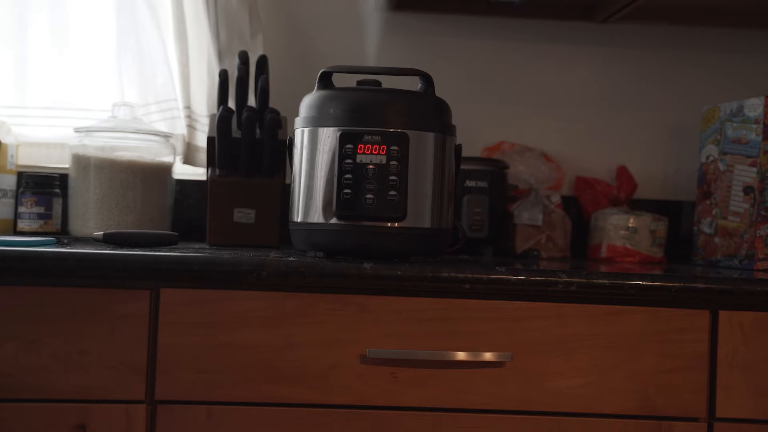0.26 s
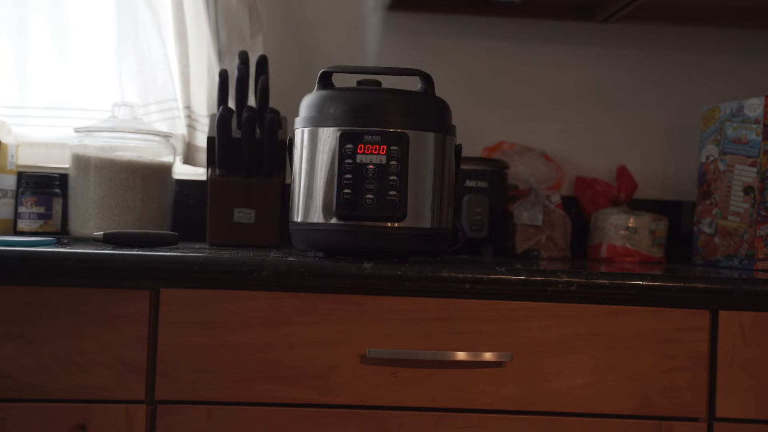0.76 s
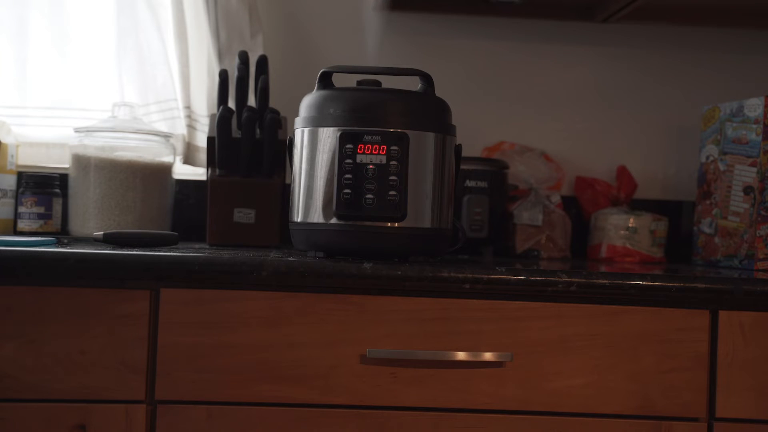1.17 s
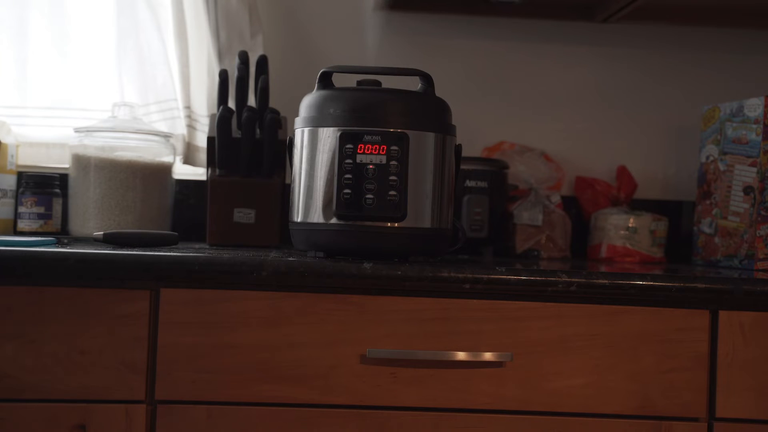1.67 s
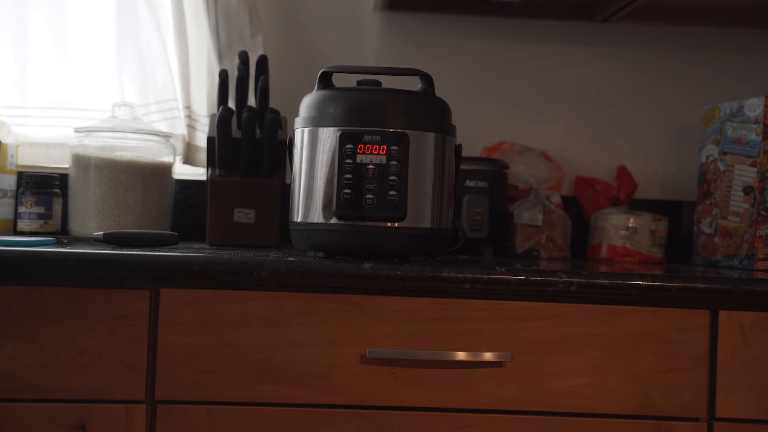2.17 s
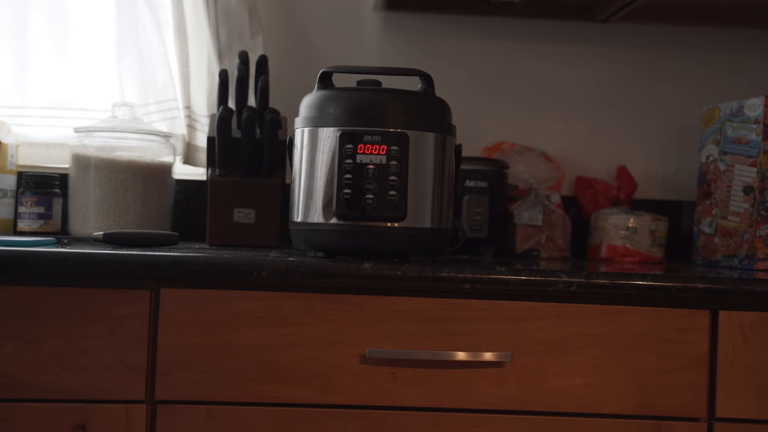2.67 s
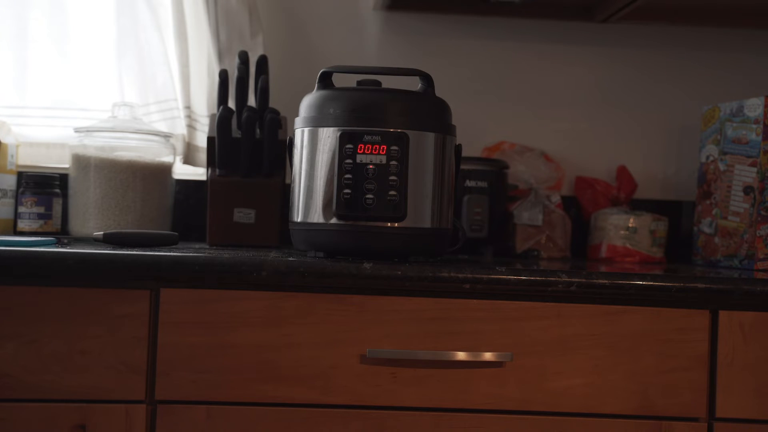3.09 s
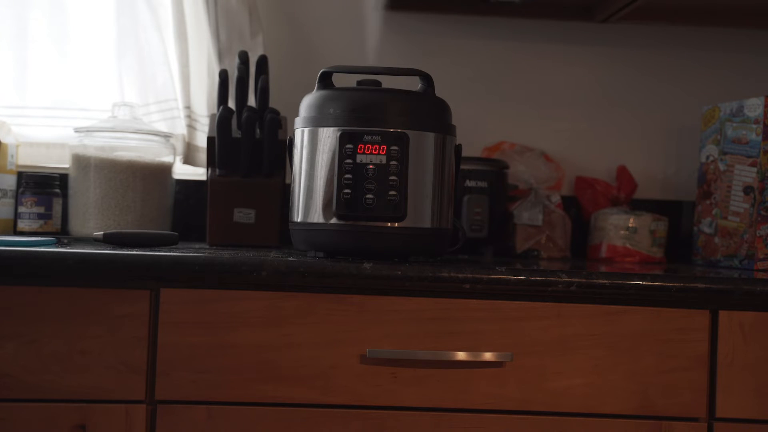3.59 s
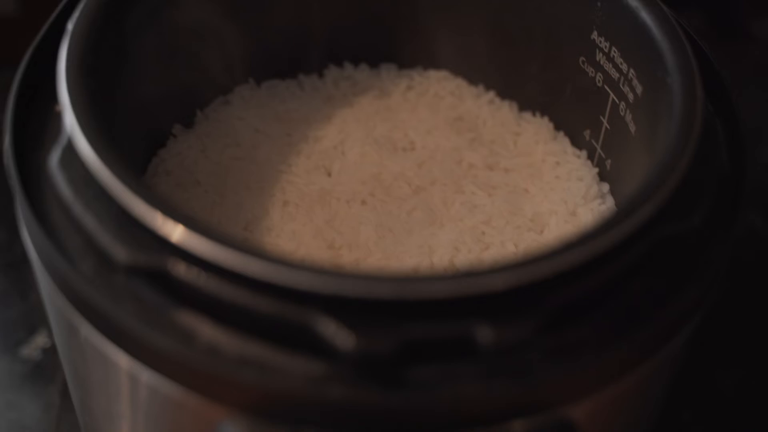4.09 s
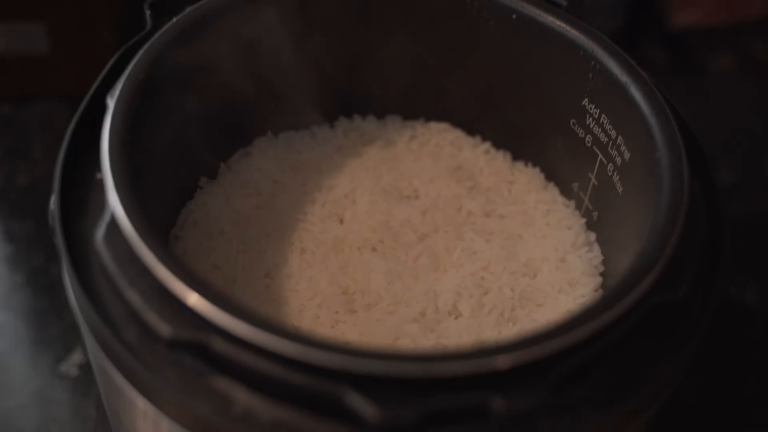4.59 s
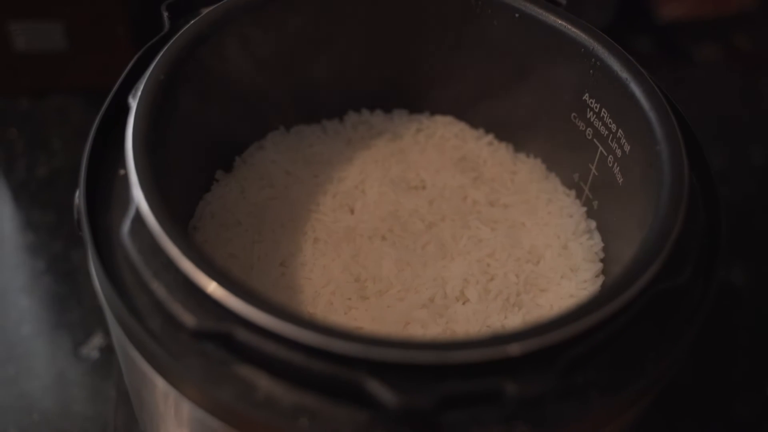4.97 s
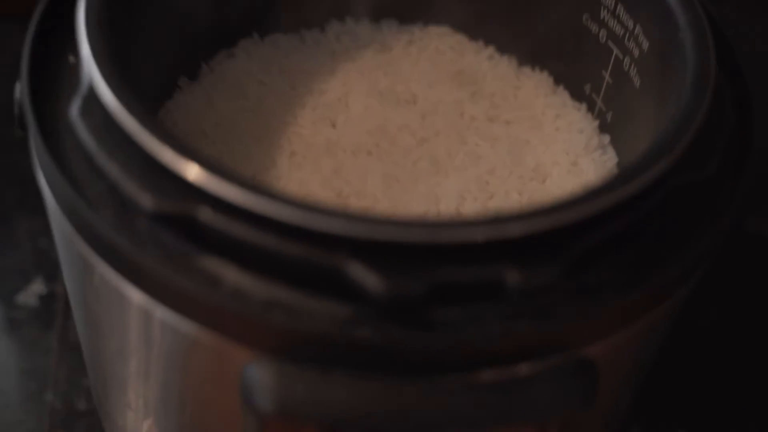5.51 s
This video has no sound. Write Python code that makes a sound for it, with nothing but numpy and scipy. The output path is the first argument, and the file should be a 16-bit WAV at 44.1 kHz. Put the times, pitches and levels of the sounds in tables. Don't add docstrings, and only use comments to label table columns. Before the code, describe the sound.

From 0 s, a pressure cooker vents steam across a kitchen: a dense, bright, steady hiss with little bass, tinged by narrow metallic whistling resonances, with short room reflections. It starts slightly fuller during the first third of a second, then very gradually eases. A barely perceptible mains hum lies beneath. Close, small handling sounds intrude: faint hollow taps and rubbing near 0.9 s, a light knock at 1.5 s, a sharper click around 1.9 s, soft fumbling ticks from 2.5 to 2.7 s, and another click at 3.6 s. At about 4.13 s the loud hiss cuts abruptly to a much quieter, smooth airy hiss beside the open pot, over faint low appliance rumble that heaves gently around 4.8 s. Taps and a crisp snap come at 4.3-4.4 s, tiny creaking ticks at 4.7-4.9 s, and last light knocks at 5.3-5.4 s. The stereo image is wide and natural.

```python
import sys
import numpy as np
from scipy import signal
from scipy.fft import rfft, irfft, next_fast_len
from scipy.io import wavfile

SR = 44100
rng = np.random.default_rng(int(sys.argv[2]) if len(sys.argv) > 2 else 0)


def waveform_to_disk(signal):
    frames = np.transpose(np.atleast_2d(signal))
    scaled = np.clip(frames, -1, 1) * 32767
    samples = np.round(scaled).astype(np.int16)
    wavfile.write(sys.argv[1], SR, samples)


def makeup_ratio(level_db):
    decades = np.asarray(level_db, float) / 20
    return 10 ** decades


N = 253335
SCENE_CHANGE_S = 4.1325
SIZE = next_fast_len(N + SR)
HZ = np.maximum(np.arange(SIZE // 2 + 1) * SR / SIZE, 1)
HALVES = np.array([[.5], [-.5]])


def rms_one(x):
    return x / np.sqrt(np.mean(np.abs(x) ** 2) + 1e-30)


def at_hz(points):
    hz, value = np.transpose(points)
    return np.interp(np.log(HZ), np.log(hz), value)


def drift(rate_hz):
    pole = np.exp(-80 * np.pi * rate_hz / SR)
    noise = rng.standard_normal(N // 40 + 2002)
    slow = signal.lfilter([1], [1, -2 * pole, pole * pole], noise)[2000:]
    return np.interp(np.arange(N) / 40, np.arange(len(slow)), rms_one(slow))


def kitchen(t60_s, gap_m):
    t = np.arange(SR // 2) / SR
    envelope = makeup_ratio(-60 * t / t60_s) * (t > .004)
    mid, side = rfft(rng.standard_normal((2, len(t))) * envelope, SIZE)
    alike = .985 / (1 + (2 * HZ * gap_m / 343) ** 2) ** 2
    return rms_one(np.sqrt(1 + alike) * mid + np.sqrt(1 - alike) * side * [[1], [-1]])


def flow(registers, start_s, swells=()):
    surge_s = 0.27
    t = np.arange(N) / SR
    since = np.maximum(t - start_s, 0)
    rush = np.exp(-since / surge_s)
    levels_db = [db + rush_db * rush - sag * since for db, rush_db, sag in registers]
    for s, lift_db, half_s in swells:
        levels_db[0] = levels_db[0] + lift_db * np.exp(-((t - s) / half_s) ** 2)
    return levels_db


def hiss(levels_db, spectrum, resonances, direct_db, lean_db, lag, gap_m, flutter_db, patchy_db):
    split_hz = (70, 300, 1500, 5500, 15500)
    colour_db = at_hz(spectrum)
    for hz, width, lift_db in resonances:
        colour_db = colour_db + lift_db / (1 + (2 * (HZ - hz) / width) ** 2)

    late = np.exp(-1j * np.pi * HZ * lag / SR * np.array([[1], [-1]]))
    straight = makeup_ratio(at_hz(direct_db))
    eddies = 0
    for _ in range(3):
        path = straight * late + kitchen(0.45, gap_m)
        eddies = eddies + rfft(rng.standard_normal(SIZE)) * path
    tone = makeup_ratio(colour_db + at_hz(lean_db) * HALVES)
    heard = eddies * tone / np.sqrt(1 + straight ** 2)

    under = [0] + [1 / (1 + (HZ / hz) ** 4) for hz in split_hz[1:-1]] + [1]
    flutter = drift(8.0)
    out = 0
    for k, db in enumerate(levels_db):
        inside = np.mean(heard, axis=0)[(HZ > split_hz[k]) & (HZ < split_hz[k + 1])]
        power = 2 * np.sum(np.abs(inside) ** 2) / SIZE ** 2
        gain = makeup_ratio(db + flutter_db * flutter + patchy_db * drift(13.5))
        register = irfft(heard * (under[k + 1] - under[k]), SIZE)[:, :N]
        out = out + gain * register / np.sqrt(power)
    return out


def hum():
    # (frequency [Hz], rms level [dB])
    partials = [(118.4, -94.5)]
    t = np.arange(N) / SR
    buzz = 0
    for hz, db in partials:
        buzz = buzz + np.sqrt(2) * makeup_ratio(db + 1.2 * drift(3.0)) * np.sin(2 * np.pi * hz * t)
    return makeup_ratio(np.array([[.6], [-.6]])) * buzz


def knocks():
    # (time [s], peak level [dB], pitch [Hz], left over right [dB])
    taps = [(.904, -59, 550, 0), (2.032, -62, 220, 3), (4.322, -64, 450, 1), (4.3385, -47, 420, 2),
            (5.330, -68.5, 223, 2), (2.530, -68, 210, 0), (2.748, -60, 422, 2)]
    snaps = [(4.3635, -39, 3000, -1)]
    bumps = [(.942, -52, 700, 6), (2.04, -80, 70, 0), (2.521, -52, 500, 5), (2.706, -63.5, 302, 0),
             (4.855, -56, 810, -1), (5.328, -51, 1700, 4), (2.519, -63, 271, 2)]
    rings = [(1.548, -48.5, 1360, 2), (3.65, -61.5, 570, -2), (4.345, -57, 500, 2), (5.435, -58, 1800, 0),
             (2.012, -55, 960, 2), (1.915, -48, 1170, 1.7)]
    creaks = [(4.70, -70, 510, 4), (4.77, -70, 540, 0)]
    rubs = [(.95, -53.5, 590, 0), (1.882, -43, 2440, 5), (1.54, -62, 470, 3), (2.012, -56, 624, 8),
            (2.09, -58.5, 550, 1), (2.644, -58.5, 503, 6), (3.622, -44, 2200, -2), (4.34, -52.5, 1050, 3),
            (4.339, -67, 200, 2), (5.345, -62, 700, 3), (.943, -56, 1050, 4), (2.67, -64, 400, 2)]
    pings = [(1.537, -59, 440, 7), (1.572, -62, 430, 2), (1.890, -33, 2800, 3), (1.897, -40, 1910, 3),
             (2.036, -51, 1000, 2), (2.521, -58, 445, 3), (2.531, -53, 730, 5), (2.546, -51.5, 540, 1),
             (2.563, -55, 402, 2), (2.578, -58, 480, 2), (2.643, -57, 700, 4), (2.655, -52, 527, 4),
             (2.673, -57, 503, 4), (2.690, -63, 500, 3), (3.628, -41, 3400, -2), (3.64, -48, 2050, -2),
             (4.352, -56, 493, 3), (4.3635, -49, 540, -1), (4.379, -54, 520, 2), (4.393, -64, 540, 2),
             (4.711, -64, 510, 4), (4.764, -62, 540, 1), (4.786, -66, 520, 0), (4.802, -60, 530, 1),
             (4.822, -64, 530, 2), (4.845, -66, 550, 2), (4.854, -59, 780, -1), (4.863, -60, 960, -1),
             (4.877, -59, 780, -1), (.942, -51, 1150, 5), (.943, -52, 620, 7), (.952, -53, 660, 3),
             (.957, -59, 900, 3), (.972, -57, 560, 1), (.983, -55, 600, 0), (1.005, -59, 720, 0),
             (5.334, -59, 770, 5), (5.348, -59, 780, 4), (5.368, -59, 750, 2), (5.349, -55, 2150, 3),
             (5.421, -53, 2100, 0), (4.341, -52, 2600, 2), (4.3635, -51, 2050, -1)]
    scuffs = [(.941, -52, 700, 5), (1.537, -62, 500, 3), (1.878, -40, 2200, 3), (2.52, -56, 500, 2),
              (2.642, -58, 520, 3), (3.62, -43, 2300, -2), (4.339, -52, 1100, 2), (4.36, -56, 1100, 1),
              (4.85, -60, 1200, 0), (5.326, -53, 1500, 3)]
    # (events, ring time T60 [s], breadth [octaves])
    kinds = [(taps, 0.058, 0.7), (snaps, .02, 2.1), (bumps, 0.19, 1.32), (rings, 0.17, 0.44),
             (creaks, 0.44, 0.24), (rubs, 0.37, 1.24), (pings, 0.035, 0.33), (scuffs, .5, 1.9)]

    out = np.zeros((2, N + SR))
    t = np.arange(SR // 2) / SR
    for rows, t60_s, breadth in kinds:
        for s, db, hz, pan_db in rows:
            when, size, grit = rng.random((3, len(t)))
            slips = (when < 160 / SR) * .7 * (2 * size - 1)
            slips = slips + .25 * (2 * grit - 1)
            slips[0] = .35 / t60_s
            edges = hz * 2 ** (np.array([-.5, .5]) * max(breadth, .1))
            hollow = signal.butter(2, edges, "band", fs=SR, output="sos")
            no_bass = signal.butter(2, 0.76 * edges[0], "high", fs=SR, output="sos")
            body = signal.sosfilt(hollow, slips * makeup_ratio(-60 * t / t60_s))
            body = signal.sosfilt(no_bass, body)
            at = round(s * SR)
            out[:, at:at + len(t)] += makeup_ratio(db) * body / np.abs(body).max() * makeup_ratio(HALVES * pan_db)
    close = out[:, :N]
    echo = irfft(rfft(close.mean(axis=0), SIZE) * kitchen(0.33, gap_m=0.057), SIZE)[:, :N]
    return close + makeup_ratio(-6.5) * echo


def open_pot():
    # (settled level [dB], extra in the rush [dB], sag [dB/s])
    registers = [
        (-88, -1.5, 0.01),
        (-70.5, .3, .5),
        (-61.5, 1.4, .1),
        (-58, 0.53, 0.25),
    ]
    # (time [s], extra rumble [dB], half length [s])
    swells = [
        (4.8, 7.5, 0.28),
        (5.63, 3, .06),
    ]
    # (frequency [Hz], level per Hz [dB])
    spectrum = [(25, -45), (60, -26), (100, -10.5), (170, -17), (250, -10), (600, -10), (900, -6.5),
                (1350, -2.5), (2100, -1), (5000, -1), (9400, -3), (12000, -7.5), (15700, -8)]
    # (frequency [Hz],
    # width [Hz], lift [dB])
    resonances = [(102, 34, 13), (256, 24, 8.1), (2370, 410, 2.5), (8000, 92, 1.5)]
    # (frequency [Hz], level [dB])
    direct_db = [(100, 4), (500, -6), (1500, -7.5), (3000, -11.5), (8000, -4), (15000, -12)]
    # (frequency [Hz], level [dB])
    lean_db = [(60, 0.0), (110, 0.0), (200, 0.0), (380, 0.0), (700, 0.5), (1290, -1.0), (2380, -0.5),
               (4400, -0.5), (8120, -1.5), (15000, -0.5)]
    return hiss(flow(registers, SCENE_CHANGE_S, swells), spectrum, resonances, direct_db, lean_db,
                lag=2.6, gap_m=.13, flutter_db=.15, patchy_db=.2)


def valve_jet():
    # (settled level [dB], extra in the rush [dB], sag as pressure falls [dB/s])
    registers = [
        (-86.5, 2, 0.4),
        (-64, 7, -0.2),
        (-46, 4.5, 0.75),
        (-42.5, 1.1, 0.52),
    ]
    # (frequency [Hz], level per Hz [dB])
    spectrum = [(25, -49), (60, -49), (105, -41), (160, -35), (820, -14), (1300, -9.5), (2000, -3.5),
                (3400, -2), (5600, -3.5), (8600, -2), (10700, -5), (12900, -6), (13800, -3.5), (15700, 0)]
    # (frequency [Hz], width [Hz], lift [dB])
    resonances = [(1970, 150, 1.5), (2520, 150, -1), (2810, 80, 4.5), (2980, 200, -2.5), (3130, 110, 7),
                  (3305, 40, 4), (3380, 50, 2.5), (3475, 30, 3), (3640, 110, 5.5), (3810, 40, 2.5),
                  (3885, 40, 3), (4050, 50, 3), (4310, 60, 2), (4735, 90, 2), (4920, 210, 2), (7120, 89, 3),
                  (7430, 65, 3), (7940, 30, 3), (8340, 110, 4), (8840, 44, 4), (9060, 43, 3), (9800, 63, 3),
                  (13470, 50, 3), (14200, 670, 2.5), (14830, 55, 2.5), (15280, 40, 2.5), (15650, 76, 2.5)]
    # (frequency [Hz], level [dB])
    direct_db = [(100, 6), (400, 5.5), (1000, -27), (2500, -13), (3600, -3), (7000, -4.5), (10500, -6),
                 (13000, -4.5), (14200, 5.5), (15700, -21)]
    # (frequency [Hz], level [dB])
    lean_db = [(60, 0.0), (110, 0.0), (200, 0.0), (380, 0.0), (700, -2.0), (1290, -3.5), (2380, -1.0),
               (4400, 1.0), (8120, -1.0), (15000, 1.0)]
    return hiss(flow(registers, 0), spectrum, resonances, direct_db, lean_db,
                lag=0, gap_m=0.14, flutter_db=0.37, patchy_db=0.24)


def scene():
    t = np.arange(N) / SR
    before = np.clip((SCENE_CHANGE_S - t) / .002 + .5, 0, 1)
    return before * (valve_jet() + hum()) + (1 - before) * open_pot() + knocks()


def band_limit(x):
    return signal.sosfilt(signal.butter(12, 15830, fs=SR, output="sos"), x)


def record(dry):
    cut = irfft(rfft(dry, SIZE) * (HZ < 15755), SIZE)[:, :N]
    return band_limit(cut)


dry = scene()
out = record(dry)
waveform_to_disk(out)
```